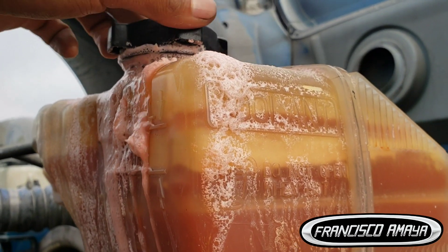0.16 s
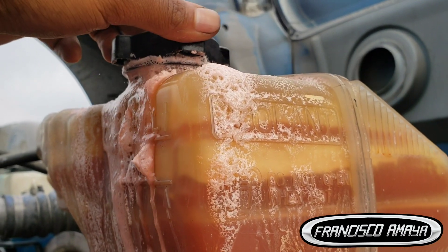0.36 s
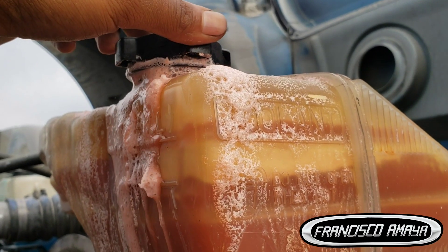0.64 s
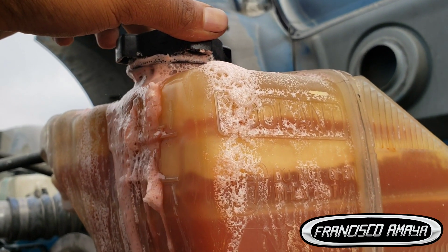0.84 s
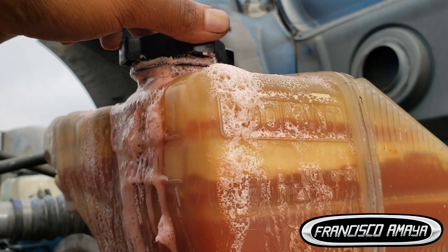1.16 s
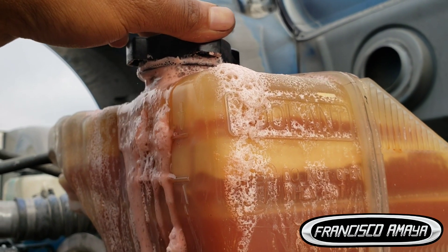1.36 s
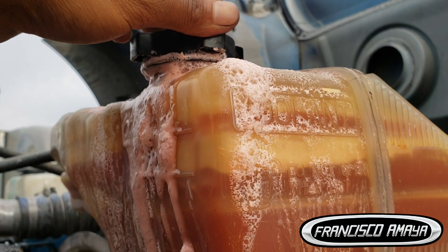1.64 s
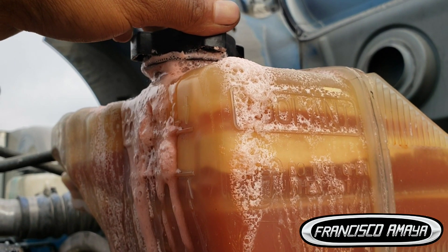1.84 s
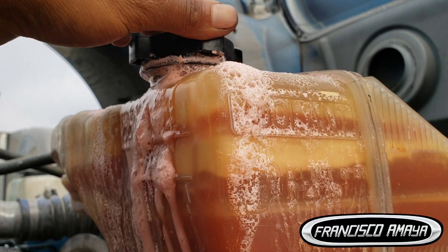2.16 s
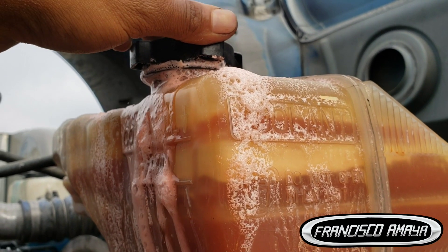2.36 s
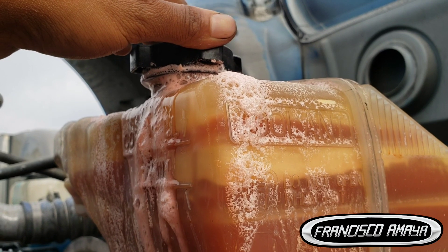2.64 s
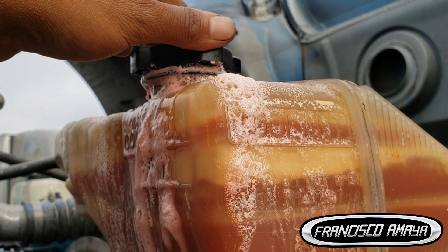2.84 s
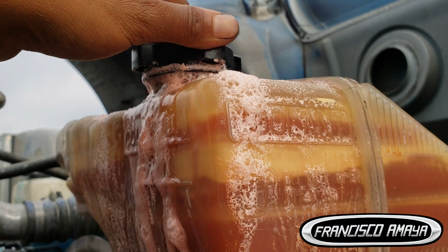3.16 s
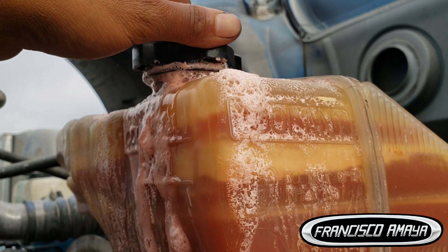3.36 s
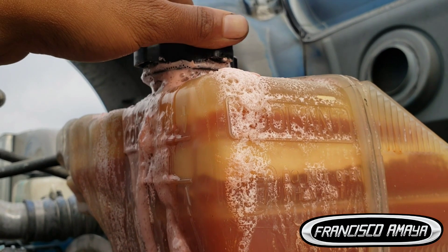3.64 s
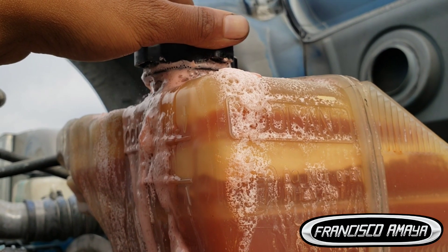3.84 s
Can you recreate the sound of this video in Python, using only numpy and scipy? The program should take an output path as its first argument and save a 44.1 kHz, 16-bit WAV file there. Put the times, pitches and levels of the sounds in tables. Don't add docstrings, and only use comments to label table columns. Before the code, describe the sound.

Pressurised gas hisses from a loosened coolant tank cap, sputtering through wet foam in gusty wind.

```python
import sys
import numpy as np
from scipy import signal
from scipy.fft import rfft, irfft
from scipy.io import wavfile

SR = 44100
rng = np.random.default_rng(int(sys.argv[2]) if len(sys.argv) > 2 else 0)


def unload_wav(signal):
    wavfile.write(
        sys.argv[1],
        SR,
        np.round(np.clip(np.atleast_2d(signal).T, -1, 1) * 32767).astype(np.int16),
    )


def invert_db(x):
    u = np.asarray(x, float) / 20
    return 10 ** u


N = 176400

# time in seconds, level in dB, brightness in dB.
JET = [(0, -41, -2), (.3, -45, 3), (.45, -42.5, -2), (.6, -39, -1.5), (.72, -41.5, -1.5), (.84, -39, 3.5),
       (1.0, -42, -0.5), (1.3, -44.5, -1), (1.6, -45, -1), (1.95, -43.5, -0.5), (2.15, -43, -0.5),
       (2.55, -42, 2), (2.7, -43.5, -0.5), (2.95, -39.5, 0), (3.2, -39, 0.5), (3.45, -39.5, 2),
       (3.66, -36.5, 0.5), (4, -33, 3)]
# start in seconds, end in seconds, treble loss in dB, share of it lost in the middle (0-1).
PLUGS = [(.113, .293, 21, .75), (.455, .584, 40, .86), (.862, .981, 22, .8), (1.64, 1.700, 9, .3),
         (2.18, 2.266, 22, .6), (2.24, 2.264, 18, .6), (2.402, 2.438, 7, .9), (2.748, 2.766, 9, .9),
         (2.798, 2.83, 9, .8), (2.822, 2.85, 40, .8), (2.965, 3.062, 19, .6), (3.045, 3.1, 10, .8),
         (3.088, 3.184, 21, .55), (3.165, 3.183, 14, .9), (3.5, 3.529, 14, .95), (3.672, 3.698, 10, .9),
         (3.688, 3.722, 19, .4)]
# frequency in Hz, level in dB per Hz.
HISS_COLOUR = [(300, -8.5), (1800, -5.5), (2400, -3.5), (4600, -3.5), (6800, -6), (8000, -6.5), (10500, -9),
               (15000, -7.5)]
# frequency in Hz, width in Hz, boost in dB.
EDGE_TONES = [(1950, 250, 3), (2450, 250, -5), (4250, 500, 4), (5200, 250, 7), (6300, 600, 3),
              (8100, 500, -3), (9250, 400, -4), (10400, 800, 3), (11800, 500, 3)]
# frequency in Hz, difference in dB.
SHADOW = [(700, -1.5), (2300, -13), (3000, -15), (4700, -6.5), (6500, -2.5), (8600, -15.5), (11200, 8),
          (14800, -14.5)]
# frequency in Hz, level in dB per Hz.
SEEP_COLOUR = [(500, 1), (1100, 5), (2000, -6), (3200, 5), (4300, -4), (7000, -13.5), (9000, -15.5)]
# time in seconds, level in dB.
SEEP_LEVEL = [(0, -53), (1, -56.5), (1.9, -48), (2.6, -56), (3.4, -51.5), (4, -56)]
# frequency in Hz, level in dB per Hz.
WIND_COLOUR = [(22, -19), (40, -13), (65, -1), (110, -2.5), (220, -9.5), (400, -20.5), (800, -45),
               (1500, -82)]
# time in seconds, level in dB.
LEFT_WIND = [(0, -46.5), (.7, -39.5), (1.05, -47), (1.3, -49), (1.6, -50.5), (1.9, -46.5), (2.1, -62),
             (2.3, -54), (2.48, -81), (2.7, -50.5), (3, -54), (3.15, -47.5), (3.3, -44), (4, -47)]
# middle in seconds, extra level in dB, length in seconds.
BUFFETS = [
    (0.851, 13, 0.0094),
    (1.005, 13.5, 0.029),
    (1.456, 8, 0.02),
    (1.609, 14.5, 0.023),
    (1.819, 8.5, 0.0069),
]
# time in seconds, level in dB.
RIGHT_WIND = [(0, -30.5), (.1, -26.5), (.8, -28.5), (1.6, -32.5), (1.9, -40), (2.9, -45), (3.6, -43)]
# middle in seconds, half length in seconds, level in dB.
GUSTS = [(0.05, 0.0091, -18.5), (0.085, 0.029, -24), (0.168, 0.034, -22.5), (0.23, 0.017, -22.5),
         (0.343, 0.061, -25.5), (0.553, 0.048, -18.5), (0.626, 0.01, -22.5), (0.688, 0.054, -25),
         (0.88, 0.016, -25.5), (0.99, 0.057, -31), (1.198, 0.015, -36), (1.314, 0.042, -30),
         (1.459, 0.032, -37.5), (1.544, 0.018, -33), (1.726, 0.052, -34.5), (2.016, 0.027, -31.5),
         (2.483, 0.14, -39.5), (2.72, 0.069, -32), (3.122, 0.12, -35.5), (3.398, 0.077, -33),
         (3.658, 0.085, -45.5), (3.881, 0.093, -35)]
# time in seconds, peak level in dB.
KNOCKS = [(0.041, -33), (0.134, -47), (0.165, -41), (0.183, -43), (0.233, -48), (0.307, -48), (0.335, -36),
          (0.382, -39), (0.487, -41.5), (0.503, -29), (0.538, -27.5), (0.572, -27), (0.669, -35),
          (0.724, -39), (0.87, -49), (0.973, -49), (0.987, -46), (1.002, -43)]
# start in seconds, peak in dB, decay in seconds, treble in dB.
SPITS = [(0.102, -38, 0.0057, -2), (0.147, -44, 0.002, -6), (0.218, -40.5, 0.0032, -5.5),
         (0.26, -46.5, 0.0028, -10), (.297, -43, 0.14, -23), (.557, -55, 0.0019, -22),
         (0.585, -43, 0.012, -19), (.924, -42, 0.002, -10), (.957, -43, 0.0044, -7),
         (.984, -38.5, 0.035, -4), (1.681, -41, 0.034, -26), (1.703, -42, 0.046, -1.5),
         (1.84, -42, 0.0054, -20), (1.957, -40, 0.029, -1), (2.208, -38, .004, -20),
         (2.219, -47, 0.0065, -8), (2.234, -43, .002, -8), (2.242, -39, 0.0055, -29),
         (2.261, -31.5, 0.027, -15), (2.395, -40.5, 0.003, 6.5), (2.741, -38, 0.0049, 0.5),
         (2.768, -33.5, 0.011, -9), (2.828, -40.5, 0.012, -8), (2.852, -34, 0.027, -6),
         (2.959, -39.5, 0.01, 1.5), (2.999, -31, 0.0028, -33), (3.021, -34, 0.004, -28),
         (3.404, -41, .004, 8), (3.428, -44, 0.0048, 8), (3.534, -45.5, .008, 9), (3.697, -45, 0.0027, 0),
         (3.728, -32.5, 0.022, -3)]
# time in seconds, peak level in dB.
TICKS = [(.538, -56), (.909, -44), (.931, -42), (2.819, -39), (2.980, -31), (2.992, -32), (3.036, -35),
         (3.060, -34), (3.069, -35), (3.108, -35), (3.117, -37), (3.137, -42), (3.144, -41), (3.152, -35),
         (3.167, -39), (3.175, -35), (3.185, -32), (3.265, -33), (3.719, -33)]
# start in seconds, rise in seconds, decay in seconds, level in dB, pitch in Hz.
GURGLES = [(.146, .001, 0.0027, -43.5, 2800), (0.218, .001, 0.003, -39.5, 2980),
           (0.26, .001, 0.0025, -43.5, 2620), (.296, .002, 0.12, -45.5, 3060),
           (.557, .001, 0.0023, -44, 2865), (.585, .001, 0.0053, -44, 2100),
           (.909, 0.00089, .002, -48, 2000), (.924, .001, .002, -47, 2600),
           (.957, 0.00093, 0.0028, -49, 2800), (1.63, .004, 0.032, -40.5, 4000),
           (1.662, 0.032, .012, -33.5, 4140), (1.64, .01, 0.04, -44, 2050),
           (1.95, .004, 0.034, -45.5, 2000), (2.22, .002, .004, -43, 3800),
           (2.261, 0.0022, 0.076, -46, 1600), (2.262, .001, .012, -35, 3900),
           (2.999, 0.0011, .002, -36, 4200), (3.022, .001, .003, -37, 4500),
           (3.044, .002, 0.012, -42.5, 5750), (3.07, .016, 0.01, -37.5, 5350)]

CLOSE_S, OPEN_S, TREBLE_OPEN_S = 0.02, 0.002, 0.004
BASS_SHARE = 0.26
SEALED_DB = 23
SHARED = 0.6
FLUTTER = 0.12
RIGHT_LAG_S, ECHO_S, ECHO_DB = 0.00032, 0.005, -15
GUST_BRIGHTENS, LUMP_DB = 0.48, 3
KNOCK_LOW_HZ, KNOCK_HIGH_HZ, KNOCK_DB = 283, 926, 2
SPIT_LOW_HZ, SPIT_HIGH_HZ = 2050, 8100
SPIT_ATTACK_S, TICK_S = 0.0005, 0.0016
GURGLE_WIDTH = 0.17
CUTOFF_HZ, BASS_CUT_HZ = 15720, 30


def rms_one(x):
    return x / np.sqrt(np.mean(x ** 2) + 1e-20)


def in_time(rows):
    s, *columns = np.transpose(rows)
    return [np.interp(np.arange(N) / SR, s, column) for column in columns]


def at_hz(points, hz):
    point_hz, point_db = np.transpose(points)
    return np.interp(np.log(hz + 1), np.log(point_hz), point_db)


def colour(x, db_at):
    return irfft(rfft(x) * invert_db(db_at(np.fft.rfftfreq(N, 1 / SR))), N)


def drift(rate_hz):
    r = np.exp(-40 * np.pi * rate_hz / SR)
    noise = rng.standard_normal(N // 20 + 4002)
    slow = signal.lfilter([1], [1, -2 * r, r * r], noise)[4000:]
    return np.interp(np.arange(N) / 20, np.arange(len(slow)), rms_one(slow - slow.mean()))


def bands(x, low_hz, high_hz, count):
    log_hz = np.log(np.fft.rfftfreq(N, 1 / SR) + 1)
    centres = np.geomspace(low_hz, high_hz, count)
    spectrum = rfft(x)
    slices = []
    for hz, peak in zip(centres, np.eye(count)):
        share = np.interp(log_hz, np.log(centres), peak)
        slices.append((hz, irfft(spectrum * share, N)))
    return slices


def band_filter(low_hz, high_hz):
    return signal.butter(2, [low_hz, high_hz], "band", fs=SR, output="sos")


def pair(shared):
    common, own = rng.standard_normal(N), rng.standard_normal((2, N))
    return np.sqrt(shared) * common + np.sqrt(1 - shared) * own


def edge_tones(hz):
    return sum(db / (1 + (2 * (hz - f) / width) ** 2) for f, width, db in EDGE_TONES)


def plug_loss(open_s, share):
    t = np.arange(N) / SR
    loss = 0
    for start, end, db, middle in PLUGS:
        closing, clearing = (t - start) / CLOSE_S, (end - t) / open_s + 1
        loss = loss + db * share(middle) * np.clip(np.minimum(closing, clearing), 0, 1)
    return loss


def jet():
    level_db, bright_db = in_time(JET)
    hiss = rms_one(colour(pair(SHARED), lambda hz: at_hz(HISS_COLOUR, hz) + edge_tones(hz)))
    bass_loss = plug_loss(OPEN_S, lambda m: BASS_SHARE * m)
    middle_loss = plug_loss(OPEN_S, lambda m: m)
    treble_loss = plug_loss(TREBLE_OPEN_S, lambda m: 1)
    flutter = FLUTTER * np.clip(drift(41), -2, 2)
    together = 0.22 * drift(3.2) + drift(58)
    out = 0
    for hz, band in bands(hiss, 497, 22000, count=11):
        bass = np.clip(np.log(4200 / hz) / np.log(2.6), 0, 1)
        treble = np.clip(np.log(hz / 5500) / np.log(1.7), 0, 1)
        loss = bass * bass_loss + (1 - bass - treble) * middle_loss + treble * treble_loss
        flicker = (1 - 0.13 * bass) * together + 1.56 * drift(7.3)
        choke = flutter * np.minimum(loss, 14) - loss
        out = out + band * invert_db(level_db + treble * bright_db + choke + flicker)
    return out


def seep():
    sealed = 2 * np.clip(plug_loss(OPEN_S, lambda m: m ** 2) - SEALED_DB, 0, 10)
    gain = invert_db(in_time(SEEP_LEVEL)[0] + drift(12))
    noise = rms_one(colour(pair(0.32), lambda hz: at_hz(SEEP_COLOUR, hz) - 30 * (hz < 150)))
    (_, dull), (_, bright) = bands(noise, 3400, 4600, count=2)
    return gain * (dull * invert_db(-0.2 * sealed) + bright * invert_db(-sealed))


def wind(level_db, calm_db):
    noise = rng.standard_normal(N)
    noise = rms_one(colour(noise, lambda hz: at_hz(WIND_COLOUR, hz) - 40 * (hz < 18)))
    lumps = drift(13.3)
    out = 0
    for hz, band in bands(noise, 48, 1450, count=6):
        gust_db = GUST_BRIGHTENS * np.log2(hz / 90) * (level_db - calm_db)
        depth_db = LUMP_DB * np.clip(np.log2(hz / 25) / 3.3, 0, 1)
        lump_db = depth_db * (0.46 * lumps + 0.61 * drift(42))
        out = out + band * invert_db(level_db + gust_db + lump_db)
    return out


def both_winds():
    t = np.arange(N) / SR
    buffets_db = sum(db * np.exp(-((t - s) / length) ** 2) for s, db, length in BUFFETS)
    left = wind(in_time(LEFT_WIND)[0] + buffets_db, calm_db=-44.5)
    gusts = sum(invert_db(db) * np.exp(-((t - s) / half) ** 4) for s, half, db in GUSTS)
    right_db = 20 * np.log10(invert_db(in_time(RIGHT_WIND)[0]) + gusts)
    return np.array([left, wind(right_db, calm_db=-21.5)])


def knocks():
    s, db = np.transpose(KNOCKS)
    clicks = np.full(N, 1e-18)
    clicks[(s * SR).astype(int)] = invert_db(db + KNOCK_DB) * rng.choice([-1, 1], len(s))
    band = band_filter(KNOCK_LOW_HZ, KNOCK_HIGH_HZ)
    dull = signal.sosfilt(np.vstack([band, band]), clicks)
    return dull * SR / (2 * (KNOCK_HIGH_HZ - KNOCK_LOW_HZ))


def spits():
    t, wet, dry = np.arange(N) / SR, np.zeros(N), np.zeros(N)
    ticks = [(s, db, TICK_S, -22) for s, db in TICKS]
    for s, db, decay, treble_db in SPITS + ticks:
        attack = np.clip((t - s) / SPIT_ATTACK_S, 0, 1)
        shape = invert_db(db) * attack * np.exp(-np.clip(t - s, 0, 1) / decay)
        wet = wet + shape
        dry = dry + invert_db(treble_db) * shape
    spray = invert_db(1.2 * drift(150))
    middle = band_filter(SPIT_LOW_HZ, SPIT_HIGH_HZ)
    top = band_filter(SPIT_HIGH_HZ, CUTOFF_HZ)
    wet_noise = colour(pair(SHARED), lambda hz: 2 * edge_tones(hz))
    wet_noise = rms_one(signal.sosfilt(np.vstack([middle, middle]), wet_noise))
    dry_noise = rms_one(signal.sosfilt(top, pair(SHARED)))
    return spray * (wet * wet_noise + dry * dry_noise)


def gurgles():
    out, noise = np.zeros((2, N + SR)), pair(SHARED)
    t = np.arange(SR // 3) / SR
    for s, rise, decay, db, hz in GURGLES:
        i = int(s * SR)
        band = band_filter(hz * (1 - GURGLE_WIDTH), hz * (1 + GURGLE_WIDTH))
        throb = rms_one(signal.sosfilt(band, noise[:, i:i + len(t)]))
        swell = np.minimum(t / rise, np.exp((rise - t) / decay))
        out[:, i:i + len(t)] += invert_db(db) * swell * throb
    return out[:, :N]


def ports(x):
    hz = np.fft.rfftfreq(N, 1 / SR)
    lags = rng.uniform(0.046, 1, (2, 12, 1))
    strength = invert_db(ECHO_DB - 1.9 * lags) * rng.choice([-1, 1], lags.shape)
    echoes = 1 + np.sum(strength * np.exp(-2j * np.pi * hz * ECHO_S * lags), axis=1)
    right = invert_db(at_hz(SHADOW, hz)) * np.exp(-2j * np.pi * hz * RIGHT_LAG_S)
    return irfft(rfft(x) * echoes * [np.ones_like(right), right], N)


def scene():
    winds = both_winds()
    cap = jet() + spits() + gurgles() + seep()
    return ports(cap) + winds + knocks() * [[0], [1]]


def top_cut(x):
    return signal.sosfilt(signal.butter(12, 15900, fs=SR, output="sos"), x)


def record(dry):
    def ends_db(hz):
        top = -90 * np.clip((hz - CUTOFF_HZ) / 200, 0, 1)
        return top - 10 * np.log10(1 + (BASS_CUT_HZ / (hz + 1)) ** 6)
    return top_cut(colour(dry, ends_db))


dry = scene()
out = record(dry)
unload_wav(out)
```